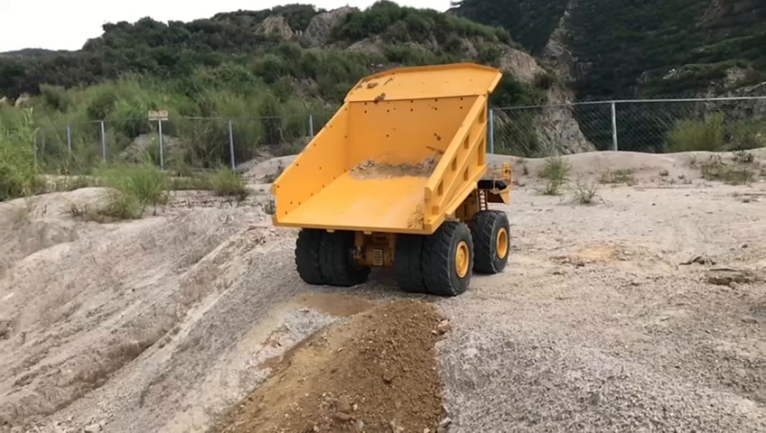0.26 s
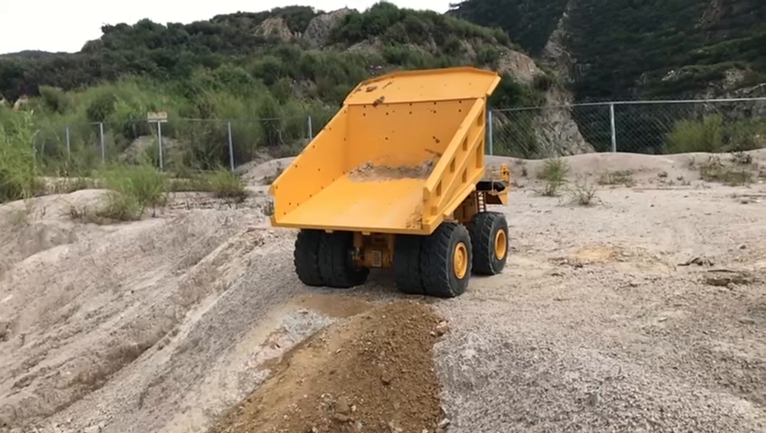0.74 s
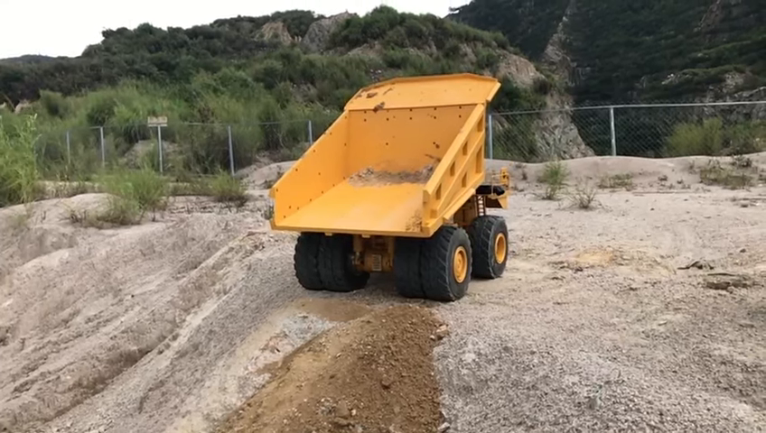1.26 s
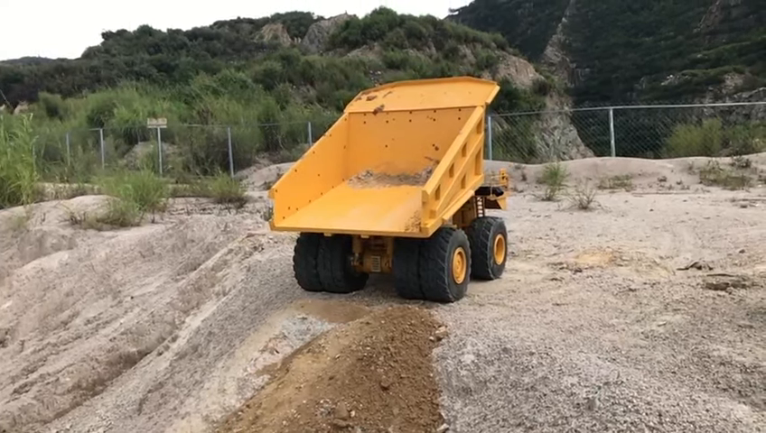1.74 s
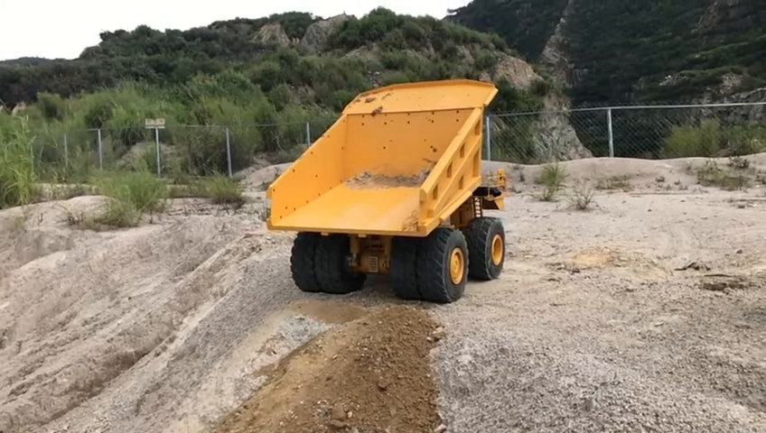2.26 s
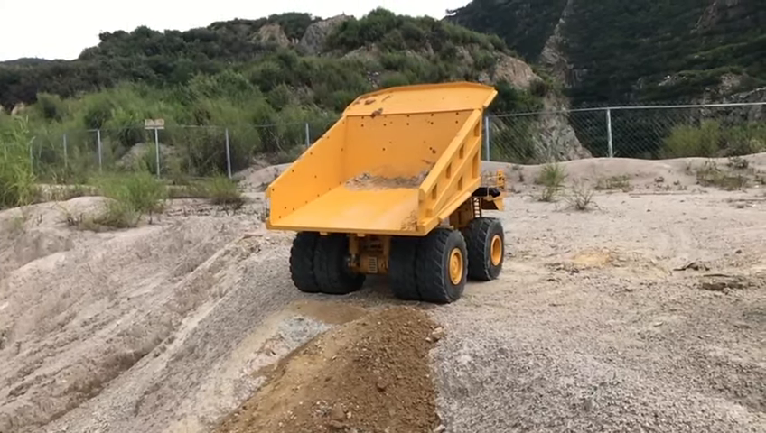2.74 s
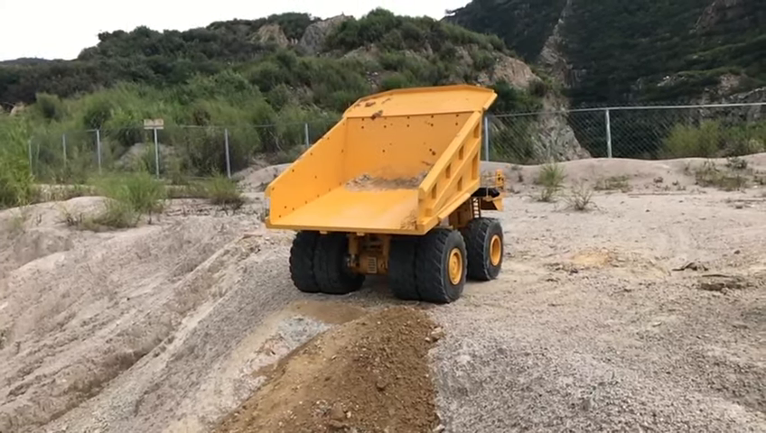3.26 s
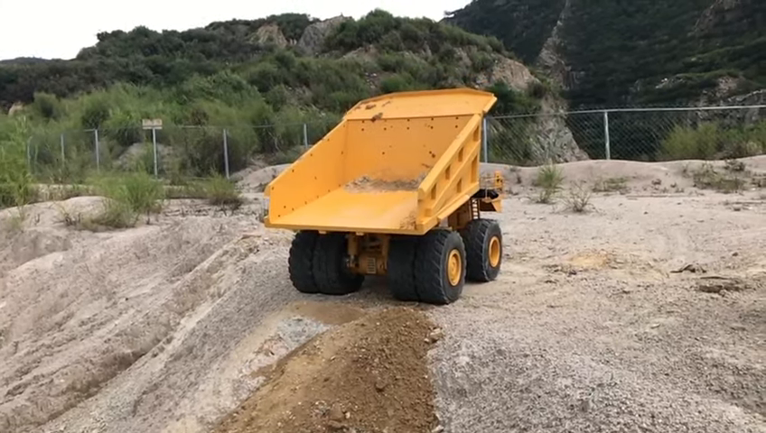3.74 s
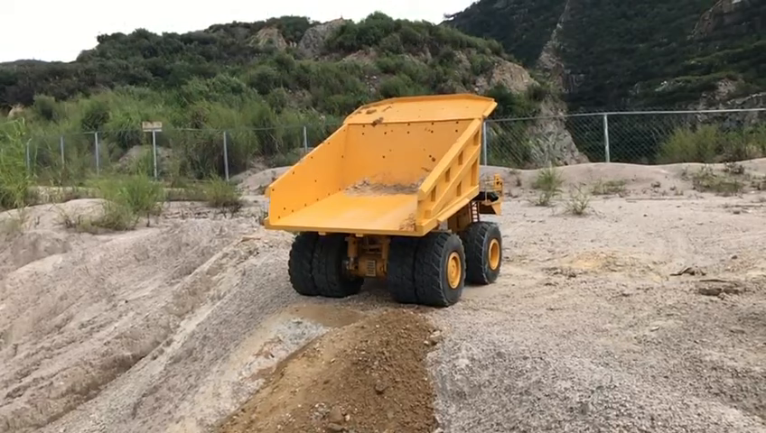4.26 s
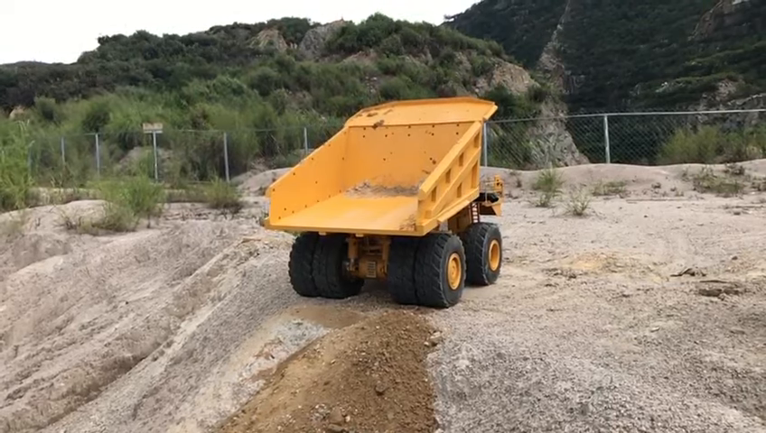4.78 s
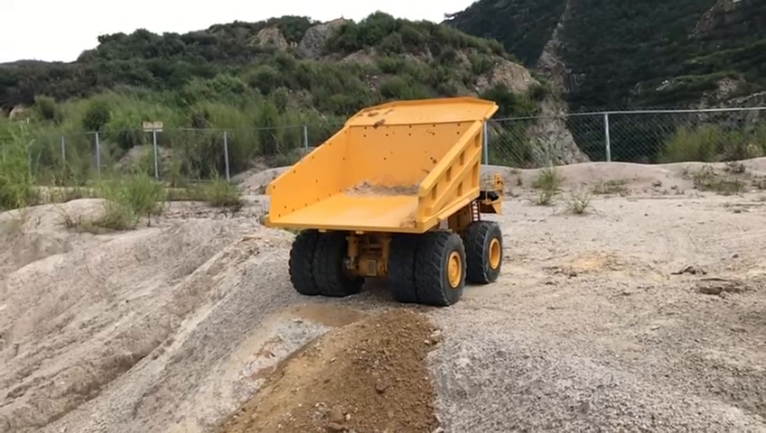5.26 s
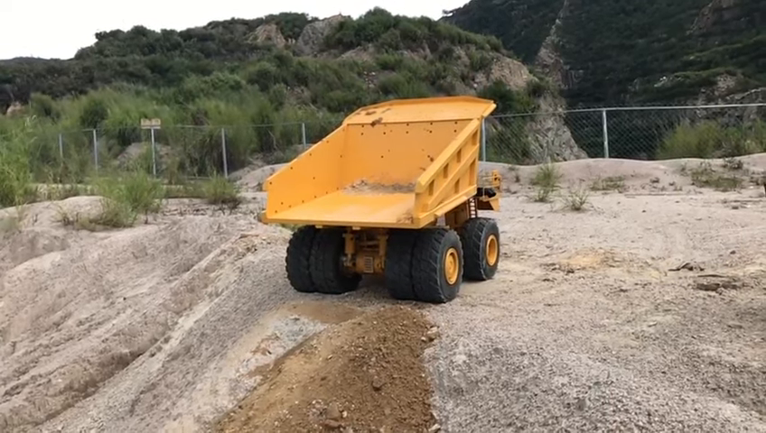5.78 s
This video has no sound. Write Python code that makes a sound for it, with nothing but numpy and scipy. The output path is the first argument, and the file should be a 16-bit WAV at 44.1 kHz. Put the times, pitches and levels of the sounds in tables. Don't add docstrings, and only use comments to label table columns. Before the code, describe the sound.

Outdoors on open gravelly ground, a small electric hydraulic pump runs steadily a few metres from the microphone. Its faint, slightly rattling whine carries a thin, very high whistle and soft valve hiss. Irregular wind thumps hit the microphone, densest at the start. Around three seconds the pump eases and rises very slightly in pitch; wind bumps continue, then fade near the end.

```python
import sys
import numpy as np
from scipy import signal
from scipy.io import wavfile
from scipy.ndimage import uniform_filter1d

SR = 44100
rng = np.random.default_rng(int(sys.argv[2]) if len(sys.argv) > 2 else 0)


def master(y):
    cut = np.clip(np.atleast_2d(y).T, -1, 1)
    pcm = np.round(cut * 32767)
    wavfile.write(sys.argv[1], SR, pcm.astype(np.int16))


def level_to_linear(level):
    exponent = np.asarray(level, float) / 20
    return 10 ** exponent


N = 265217

# time in seconds, shaft turns per second.
SHAFT_SPEED = [
    (0, 42.36),
    (.4, 42.45),
    (.55, 42.546),
    (3.08, 42.546),
    (3.35, 42.86),
    (3.8, 42.93),
    (4.2, 42.86),
    (4.8, 42.96),
    (5.2, 43.18),
    (6.02, 43.05),
]
# time in seconds, level in dB.
WHISTLE_LEVEL = [(0.0, -57), (0.55, -54), (0.95, -48), (1.36, -50.5), (1.62, -46), (2.44, -50.5),
                 (2.68, -56.5), (2.71, -54), (4.05, -47), (4.74, -52), (5.14, -51.5), (6.01, -45.5)]
# time in seconds, level in dB.
GUST_LEVEL = [(0, -32.5), (.28, -33), (.36, -36), (.62, -33.5), (.9, -35), (1.1, -41.5), (1.9, -42),
              (2.25, -44.5), (2.95, -43.5), (3.2, -47.5), (3.36, -40), (3.6, -47.5), (4.15, -44),
              (4.4, -45), (4.55, -45), (5.25, -45), (6.02, -53)]


def evened(x):
    return x / np.sqrt(np.mean(x ** 2) + 1e-20)


def curves(rows):
    s, *columns = np.transpose(rows)
    return [np.interp(np.arange(N) / SR, s, column) for column in columns]


def slow(hz, count):
    values = rng.standard_normal((count, 2000))
    at = np.arange(N) * hz / SR
    before = at.astype(int)
    part = at % 1
    ease = part * part * (3 - 2 * part)
    return values[:, before] * (1 - ease) + values[:, before + 1] * ease


def soft_switch(s, width_s):
    return .5 + .5 * np.tanh((np.arange(N) / SR - s) / width_s)


def ring(x, hz, width_hz):
    return signal.lfilter(*signal.iirpeak(hz, hz / width_hz, SR), x)


def bass_cut(x):
    return signal.sosfilt(signal.butter(4, 49.3, "high", fs=SR, output="sos"), x)


def hiss():
    # frequency in Hz, level in dB per Hz.
    spectrum = [(70, -27), (150, 2.5), (230, -9.5), (330, -6), (480, -13), (900, -10.5), (1940, -11.5),
                (3000, -14), (4900, -16.5), (5500, -14), (7600, -17.5), (8500, -16.5), (9700, -17),
                (10800, -21), (16000, -23)]
    # time in seconds, level in dB.
    oil_flow = [
        (0, -59),
        (.3, -56.5),
        (1.4, -56.5),
        (2.8, -55.5),
        (3.6, -56),
        (5.1, -56),
        (6.02, -55.5),
    ]
    patchy_db, over_db, treble_sway_db = 1.16, 5.5, .35
    frames, hz = N // 128 + 5, np.fft.rfftfreq(512, 1 / SR)
    real, imaginary, patches = rng.standard_normal((frames, 257, 3)).T
    patches = uniform_filter1d(patches, size=8, axis=0)
    patches = evened(uniform_filter1d(patches, size=20, axis=1))
    f, db = np.transpose(spectrum)
    colour_db = np.interp(np.log(hz + 1), np.log(f), db)[:, None]
    treble = np.clip((hz - 8000) / 3000, 0, 1)[:, None]
    sway_db = treble * treble_sway_db * np.resize(slow(2., count=1)[0, ::128], frames)
    level_db = colour_db + patchy_db * (1 + treble) * patches + sway_db
    z = (real + 1j * imaginary) * level_to_linear(level_db)
    noise = signal.istft(z, nperseg=512, noverlap=384)[1][:N]
    return level_to_linear(curves(oil_flow)[0] + over_db) * evened(noise)


def rumble():
    lumpy_db, skirt_db, top_hz = 2.5, -16.0, 64.
    gust_db, = curves(GUST_LEVEL)
    lumps, flicks = slow(22., count=2)
    noise = rng.standard_normal(N)
    low = signal.sosfilt(signal.butter(3, top_hz, fs=SR, output="sos"), noise)
    body = evened(bass_cut(low))
    skirt = evened(signal.sosfilt(signal.butter(2, [110, 190], "band", fs=SR, output="sos"), noise))
    return level_to_linear(gust_db + lumpy_db * lumps) * (body + level_to_linear(skirt_db + 2 + 2 * flicks) * skirt)


def eddy(hz, length_s, front_db, phase):
    sag, stretch = .214, .39
    lead_s, front_s = .0037, .0054
    t = np.arange(-3000, 3000) / SR
    pitch = hz * np.exp(-sag * np.tanh(t / .0082))
    swell = np.exp(-.5 * (t / (stretch * length_s)) ** 2)
    wobble = swell * np.cos(2 * np.pi * np.cumsum(pitch) / SR + phase)
    front = (t + lead_s) / front_s
    ripple_hz = 175 * np.exp(-.45 * np.tanh(front))
    ripple = np.exp(-.5 * front ** 2) * np.cos(2 * np.pi * np.cumsum(ripple_hz) / SR + 3 * phase)
    crest = ripple * abs(ripple) * ripple
    return wobble + level_to_linear(front_db) * (ripple + .35 * crest)


def thumps():
    # time in seconds, peak in dB, wobble in Hz, length in seconds, sharp front in dB.
    strong = [(.097, -26, 120, 0.0085, -2.5), (.133, -21, 200, 0.0018, -4), (.163, -24.5, 112.9, 0.076, 0),
              (.186, -22, 140.4, 0.016, -2), (.422, -25.5, 100.3, 0.053, -20),
              (.506, -22, 87.8, .011, -10.5), (.69, -30, 64, 0.04, -12), (.85, -29.5, 88.5, 0.041, -2.5),
              (.983, -22, 79.2, 0.0082, -9.5), (1.37, -21.5, 85.3, 0.032, -11),
              (1.408, -25, 86, 0.0075, -32), (1.52, -25.5, 80.5, .015, -19), (1.698, -29, 62.3, 0.015, -18),
              (1.813, -17.5, 97, 0.0061, -15.5), (1.843, -24, 96.6, 0.029, -14),
              (2.418, -28, 87.2, 0.021, -16), (3.391, -27.5, 83.4, 0.0068, -15),
              (3.501, -19.5, 79.5, 0.015, -21.5), (3.996, -25.5, 90, 0.026, -12),
              (4.458, -29, 66.3, 0.049, -16), (4.86, -19.5, 97, 0.021, -25),
              (5.017, -18, 70.6, 0.018, -11.5), (5.095, -25.5, 111, 0.02, -12.5),
              (5.166, -29.5, 88, 0.02, -8.5)]
    # time in seconds, peak in dB.
    lesser = [(.022, -22.5), (.055, -25), (.226, -31), (.263, -29.5), (.471, -30), (.623, -32),
              (1.046, -40), (1.119, -33), (1.2, -33.5), (1.312, -29), (1.785, -27), (1.968, -35),
              (2.06, -29.5), (2.095, -29), (2.548, -31.5), (2.662, -32), (2.904, -33), (3.131, -31),
              (3.158, -37), (3.292, -32.5), (4.06, -32.5), (4.223, -31), (4.615, -26.5), (4.715, -36),
              (5.2, -30), (5.292, -36), (5.634, -34)]
    peak_db = 0.53
    dice = rng.random((len(lesser), 3)) - .5
    small_hz = 75 * (1 + 0.29 * dice[:, 0])
    small_s = 0.014 * (1 + dice[:, 1])
    small_front_db = -21 + 8 * dice[:, 2]
    eddies = np.vstack([strong, np.column_stack([lesser, small_hz, small_s, small_front_db])])
    phases = 2 * np.pi * rng.random(len(eddies))
    out = np.zeros(N + 6000)
    for (s, db, hz, length_s, front_db), phase in zip(eddies, phases):
        at = round(s * SR)
        out[at:at + 6000] += level_to_linear(db + peak_db) * eddy(hz, length_s, front_db, phase)
    return signal.sosfilt(signal.butter(2, 24, "high", fs=SR, output="sos"), out[3000:N + 3000])


def controller():
    # multiple of the whistle,
    # shaft order, level in dB under full load, in dB while the valve shifts, in dB running free.
    companions = [(0, 84, -70.5, -74, -78), (0, 105, -72, -70.5, -90), (0, 147, -72, -85, -90),
                  (0, 168, -75, -85, -85), (0, 210, -69.5, -80, -72), (1, -42, -63.5, -73, -65.5),
                  (1, 42, -77, -80, -77), (1, -7, -73, -68, -90), (1, -35, -79, -74, -90),
                  (1, -28, -79, -78, -90), (1, 70, -80, -90, -90)]
    whistle_hz = 9828.1
    flutter_db, flutter_rad, fade_db = 1.1, .1, 1.5
    shimmer_db, shimmer_hz = 0.5, 14.
    shift_s, free_s, change_s = 2.45, 3.12, .08
    carrier = 2 * np.pi * whistle_hz * np.arange(N) / SR
    shaft = 2 * np.pi * np.cumsum(curves(SHAFT_SPEED)[0]) / SR
    shifting, free = soft_switch(shift_s, 3 * change_s), soft_switch(free_s, change_s)
    quick, tremble = slow(60., count=2)
    gustiness = level_to_linear(0.48 * (curves(GUST_LEVEL)[0] + 39))
    shimmer = shimmer_db * gustiness * slow(shimmer_hz, count=1)[0]
    whistle_db = curves(WHISTLE_LEVEL)[0] + shimmer
    out = level_to_linear(whistle_db + flutter_db * quick) * np.cos(carrier + flutter_rad * tremble)
    fades = slow(7., count=len(companions))
    for (multiple, order, load_db, shift_db, free_db), fade in zip(companions, fades):
        level_db = load_db + (shift_db - load_db) * shifting + (free_db - shift_db) * free
        out += level_to_linear(level_db + fade_db * fade) * np.cos(multiple * carrier + order * shaft)
    return np.sqrt(2) * out


def pump():
    # order, level in dB at slow speed, in dB at middle speed, in dB at fast speed.
    strong_orders = [(12, -67, -67, -64), (14, -64, -60, -58), (15, -56, -59, -57), (16, -65, -67, -67),
                     (36, -61, -60, -61), (37, -57, -65, -56), (38, -65, -59, -65), (39, -68, -70, -69),
                     (42, -64, -61, -59)]
    speed_marks = [42.55, 42.9, 43.12]
    faint_orders = [22, 24, 28, 29, 31, 32, 34, 35, 40, 43, 44, 45, 47, 48, 49, 50, 56, 57, 59, 60, 61, 62]
    # frequency in Hz, width in Hz, level in dB.
    body = [(658, 87, -65), (1233, 130, -71), (1588, 190, -61), (1634, 44, -69), (1784, 180, -64.5),
            (2490, 270, -67.5)]
    faint_db, faint_spread_db = -76.5, 4
    waver_db, waver_rad, throb = 1.3, .3, .4
    hum_hz, hum_db = 1229, -66.5
    run_up_db, run_up_s = -5, 0.18
    t = np.arange(N) / SR
    speed, = curves(SHAFT_SPEED)
    angle = 2 * np.pi * np.cumsum(speed) / SR
    blur = np.interp(speed, speed_marks, [0, .6, .6])
    faint_levels = faint_db + faint_spread_db * rng.standard_normal((len(faint_orders), 3))
    orders = np.vstack([strong_orders, np.column_stack([faint_orders, faint_levels])])
    swell, drift = slow(6., count=len(orders)), slow(9., count=len(orders))
    out = np.zeros(N)
    for k, (order, *levels_db) in enumerate(orders):
        level_db = np.interp(speed, speed_marks, levels_db) + waver_db * swell[k]
        lag = .18 * order ** 2 + blur * (order % 2)
        phase = round(order) * angle + waver_rad * drift[k] + lag
        out += np.sqrt(2) * level_to_linear(level_db) * np.cos(phase)
    rattle = rng.standard_normal(N) * (1 + throb * np.cos(angle))
    for hz, width_hz, db in body:
        out += level_to_linear(db) * evened(ring(ring(rattle, hz, width_hz), hz, width_hz))
    hum = np.sqrt(2) * level_to_linear(hum_db + 2 * swell[0]) * np.cos(2 * np.pi * hum_hz * t + drift[0])
    return level_to_linear(run_up_db * np.exp(-t / run_up_s)) * out + hum


def scene():
    return (hiss() + rumble() + thumps() + controller() + pump())[None]


def masking(x):
    # low edge in Hz, high edge in Hz, whistle level in dB that empties the band.
    bands = [(9620, 9750, -50), (9960, 10120, -56), (10120, 10350, -59), (10350, 10550, -48),
             (10550, 10750, -47), (10750, 11000, -46)]
    chance_db = 7.0
    hz, t, z = signal.stft(x, SR, nperseg=2048, noverlap=1536)
    s, db = np.transpose(WHISTLE_LEVEL)
    whistle_db = np.interp(t, s, db)
    luck = rng.standard_normal((len(t), len(bands)))
    luck = np.repeat(luck, 4, axis=0)[:len(t)]
    for (low, high, limit_db), dice in zip(bands, luck.T):
        hidden = whistle_db + chance_db * dice > limit_db
        z[0][np.ix_((hz > low) & (hz <= high), hidden)] = 0
    return signal.istft(z, SR, nperseg=2048, noverlap=1536)[1][:, :N]


def low_pass(x):
    return signal.sosfilt(signal.butter(12, 15740, fs=SR, output="sos"), x)


def record(dry):
    mix = masking(dry)
    return low_pass(mix)


dry = scene()
out = record(dry)
master(out)
```